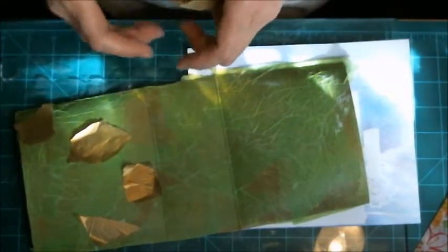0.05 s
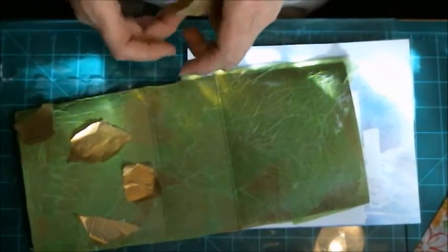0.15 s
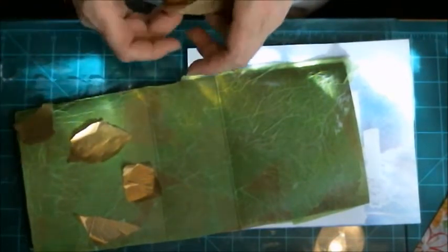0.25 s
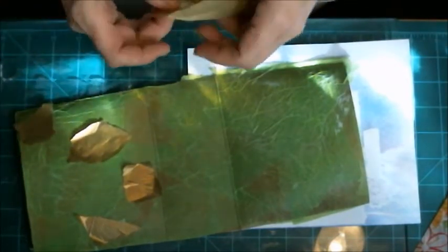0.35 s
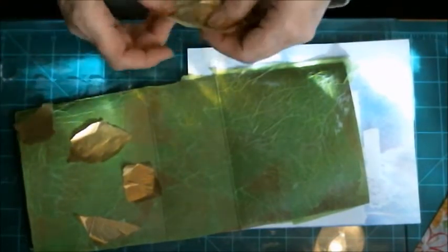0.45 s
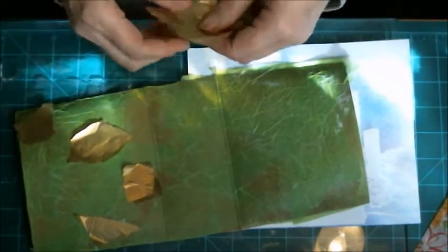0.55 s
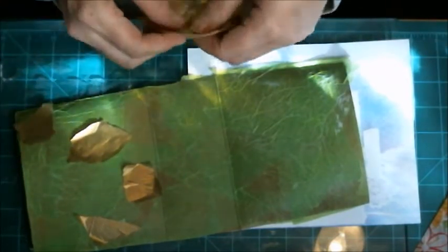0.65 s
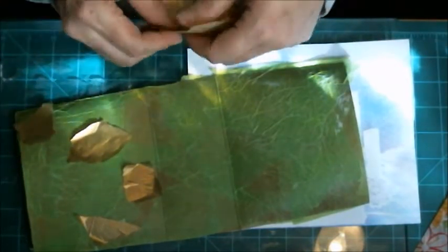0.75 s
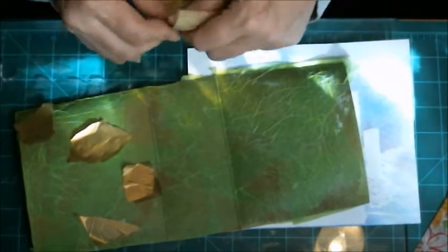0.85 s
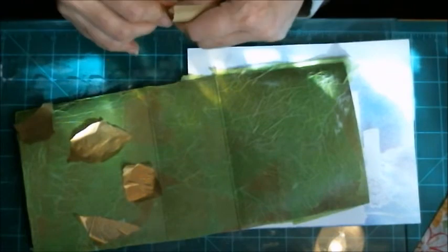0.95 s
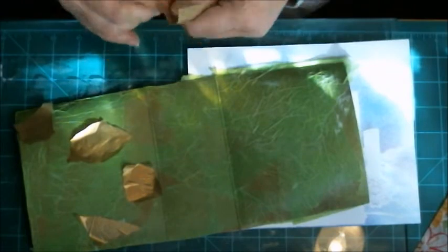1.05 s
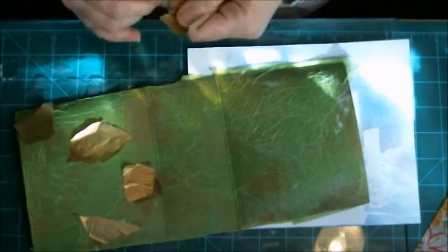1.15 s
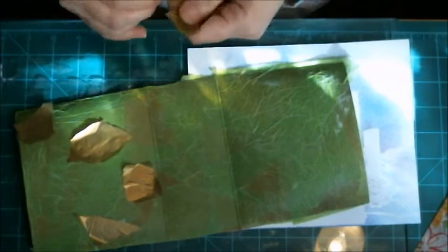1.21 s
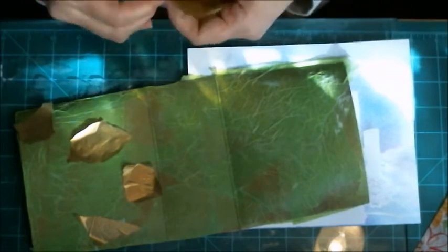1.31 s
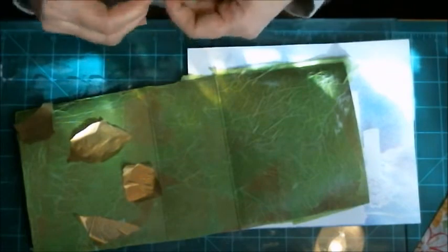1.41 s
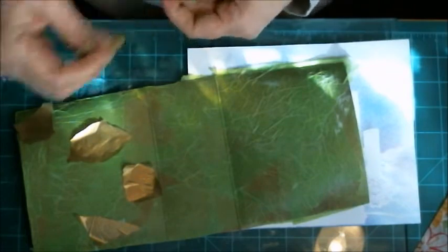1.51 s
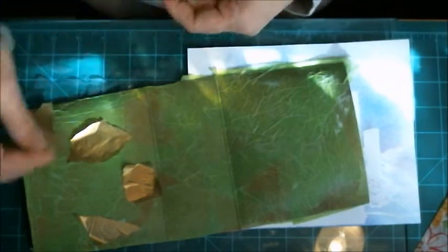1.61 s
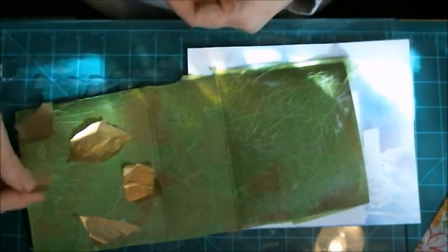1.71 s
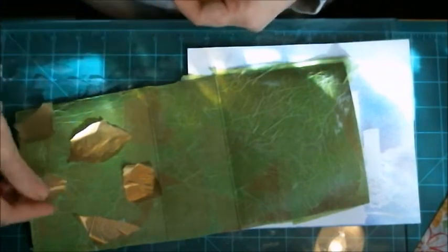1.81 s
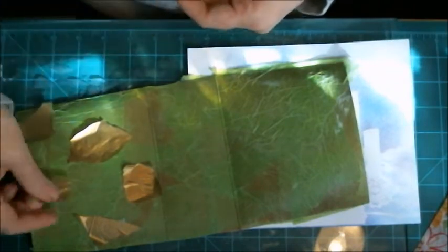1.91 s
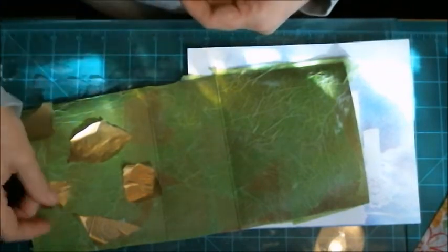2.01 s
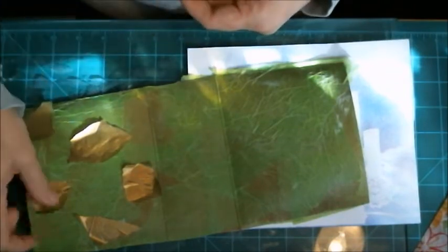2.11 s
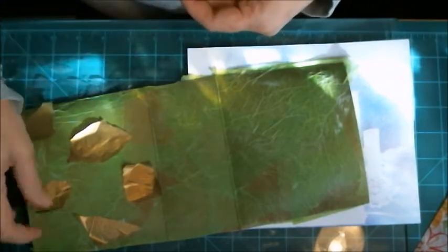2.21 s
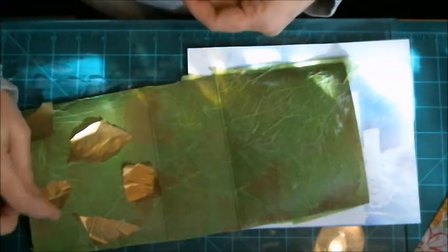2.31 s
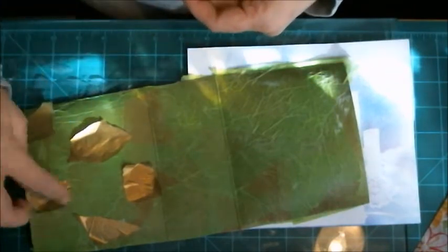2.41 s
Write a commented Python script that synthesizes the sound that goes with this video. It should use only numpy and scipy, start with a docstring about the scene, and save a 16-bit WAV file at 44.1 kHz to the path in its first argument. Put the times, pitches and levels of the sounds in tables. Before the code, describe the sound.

Stiff foil paper torn by hand in crackly bursts, then laid down with faint ticks

```python
"""Tearing of stiff foil paper

Stiff foil paper is torn close to a small microphone, then a piece is laid down with faint ticks in a quiet room.
Buckling creases are random impulses and noise bursts (crackle, snaps) that excite brief modes of small facets.
The flexing sheet pops, a twang and a puff of air mark the piece coming free, and the piece ticks on the table:
these are short tones. Sparse reflections and steady coloured noise form the room.
"""
import sys
import numpy as np
from scipy import signal
from scipy.fft import rfft, irfft
from scipy.io import wavfile
from scipy.ndimage import uniform_filter1d, minimum_filter1d

SR = 44100
rng = np.random.default_rng(int(sys.argv[2]) if len(sys.argv) > 2 else 0)


def file_out(sig):
    """Save sig as 16-bit WAV at sys.argv[1]."""
    # one column per channel
    cols = np.atleast_2d(sig).T
    # limit, then scale
    lim = np.clip(cols, -1, 1)
    pcm = np.round(lim * 32767).astype(np.int16)
    wavfile.write(sys.argv[1], SR, pcm)


N = 110250  # samples, 2.5 s

# Force of the tear: (time [s], crackle level [dB], mid body relative to crackle [dB])
TEAR_FORCE = [(0.0, -28, -19.5), (0.17, -45, 0.5), (0.199, -39.5, -25), (0.207, -29, -7),
              (0.309, -26.5, -25), (0.33, -32, 1), (0.379, -25.5, -15), (0.432, -22, -22),
              (0.462, -28, -4.5), (0.532, -17, -7), (0.581, -29, -7), (0.751, -26, -13), (0.758, -17.5, -2),
              (0.791, -22, -17), (0.82, -24.5, -5), (0.86, -25.5, -12.5), (0.982, -18, -11.5),
              (1.141, -14.5, -18.5), (1.209, -30, -9), (1.27, -22.5, -13), (1.285, -31.5, -8),
              (1.296, -18, -5), (1.402, -15.5, -7.5), (1.41, -35, -12), (1.428, -14, -15), (1.47, -34, -12),
              (1.55, -40, -10), (1.589, -30, -8.5), (1.682, -43, 5), (1.75, -61, -3), (1.911, -67, -4),
              (1.961, -64, -3), (2.07, -77.5, 7), (2.5, -82, 11.5)]
# Drive of the whole sheet's low shake: (time [s], level [dB])
SHEET_SHAKE = [(0, -99), (.2, -82), (.24, -55), (.304, -89.5), (.334, -47), (.42, -49.5), (.44, -61.5),
               (.48, -67), (.58, -71.5), (.62, -57.5), (.8, -48.5), (.88, -62), (1.016, -39), (1.242, -52),
               (1.34, -29), (1.44, -42.5), (1.49, -62.5), (1.674, -50), (1.778, -106), (2.5, -85)]
# Snaps of single creases, before the level trims:
# (centre time [s], level [dB], length [ms], mid body relative to level [dB])
CREASE_SNAPS = [(0.0328, -41, 9.4, -16), (0.116, -39.5, 54, -32), (0.1444, -30, 11, -2),
                (0.1522, -17.5, 1.6, -42), (0.164, -27.5, 25, -12), (0.2074, -25.5, 16, -26),
                (0.2156, -30, 3.4, 2), (0.2237, -16.5, 3.7, -17.5), (0.2619, -34.5, 1.6, -26),
                (0.2858, -24.5, 6.7, -40), (0.2953, -24.5, 13, -26.5), (0.33, -19, 16, -9.5),
                (0.3445, -16.5, 12, -4), (0.3569, -21.5, 11, -25), (0.3662, -14.5, 4.6, -22.5),
                (0.395, -19.5, 12, -7.5), (0.418, -16.5, 3.1, -15), (0.478, -16, 9, -4.5),
                (0.5121, -8.5, 4.6, -31.5), (0.5309, -8, 3.6, -35), (0.5427, -5, 3.7, -19.5),
                (0.55, -12.5, 2.1, -21), (0.5777, -21, 19, -35.5), (0.6007, -27, 8.9, -28.5),
                (0.6422, -20.5, 5.7, 1), (0.659, -14.5, 2.2, 5), (0.6654, -27.5, 9, 5.5),
                (0.694, -13.5, 4.3, -16), (0.7066, -25, 6, -27.5), (0.731, -20, 8.7, -4),
                (0.7325, -28.5, 3.8, -20), (0.766, -13, 6.8, -7), (0.8116, -32.5, 11, -29),
                (0.816, -13.5, 7.2, -23.5), (0.8365, -7, 3.4, -21), (0.85, -5, 1.3, -3.5),
                (0.8885, -17.5, 2.8, -19.5), (0.8995, -12, 3.8, -8), (0.9193, -11.5, 4.5, -4),
                (0.9245, -8, 4.6, -18.5), (0.966, -11, 3.9, -4), (1.011, -10, 34, -17),
                (1.0663, -23, 23, -31), (1.0744, -11, 8.4, -21.5), (1.116, -5, 3.3, -8),
                (1.1343, -17.5, 6.7, 3), (1.1617, -10.5, 3.5, -20), (1.1695, -20, 3.9, 0.5),
                (1.2169, -19, 9.4, -28), (1.2414, -17, 2.6, -20.5), (1.2616, -20, 8.4, -4.5),
                (1.3045, -1.5, 7, 0), (1.3147, -10, 12, -5.5), (1.3456, -9.5, 10, -1.5),
                (1.3563, -17.5, 16, -1.5), (1.3645, -7, 10, -15), (1.4096, -5.5, 16, -22.5),
                (1.545, -31.5, 8.6, -8), (1.5758, -31.5, 2.9, -22), (1.588, -32, 2.3, -6),
                (1.613, -23, 5.5, -11), (1.6197, -19.5, 6.3, 3), (1.6539, -14.5, 1.6, -14),
                (1.6607, -22, 3.2, -24), (1.6682, -31.5, 3.7, -4.5), (1.6753, -28, 18, 1),
                (1.7034, -34.5, 4.5, -22), (1.7099, -37.5, 34, -2.5), (1.7285, -46.5, 14, 7),
                (1.7513, -47, 6.7, -12.8), (1.7922, -49, 3.3, -10), (1.8164, -50.5, 11, -14),
                (1.847, -50, 14, -25), (1.9258, -51, 4.3, -32), (1.9774, -41.5, 18, -27),
                (2.022, -43.5, 34, -35), (2.054, -48.5, 15, -15.5), (2.252, -53.5, 12, -3),
                (2.368, -51, 5.2, -13)]
# Pops of the flexing sheet: (time [s], level before the rise [dB], pitch [Hz])
FLEX_POPS = [(.218, -41, 894), (.33, -23, 913), (0.353, -40.5, 306), (0.399, -44, 303), (0.396, -30, 918),
             (.4155, -14.5, 2130), (.421, -15.5, 2300), (.431, -13, 2210), (.444, -15.5, 2120),
             (.453, -28, 2080), (.507, -13.5, 2070), (.51, -24, 3860), (0.513, -14, 2150),
             (.525, -20, 2080), (.537, -24.5, 884), (.598, -34, 884), (.654, -35, 850), (0.666, -45.5, 265),
             (.67, -36.5, 657), (0.756, -23, 872), (0.77, -36.5, 524), (0.756, -3.5, 4000),
             (0.846, -27.5, 866), (0.85, -37.5, 3200), (0.987, -33.5, 341), (1.02, -26, 336),
             (1.021, -28, 884), (1.118, -37, 585), (1.186, -38.5, 527), (1.252, -35.5, 526),
             (1.326, -25.5, 524), (1.355, -24.5, 310), (1.359, -32.5, 864), (1.421, -29, 352),
             (1.542, -41.5, 452), (1.56, -40.5, 742), (1.587, -37.5, 336), (1.614, -32, 902),
             (1.67, -58, 850), (1.671, -36, 544), (1.677, -40, 340), (1.727, -50, 267)]
# Partials of the twang as the piece comes free: (pitch [Hz], level [dB])
TWANG_PARTIALS = [(1230, -21), (1720, -20), (1830, -17), (2150, -23), (2380, -22), (2730, -21), (2950, -24),
                  (3360, -24), (4330, -23), (4900, -21)]
# Ticks of the piece touching the table: (time [s], level before the rise [dB], pitch [Hz], 60 dB decay time [s])
TABLE_TICKS = [(1.79, -50.5, 1520, 0.11), (1.79, -56, 4320, 0.1), (1.926, -56, 5700, 0.17),
               (1.945, -42.5, 1580, 0.14), (1.974, -45, 1585, 0.15), (1.974, -51, 3150, 0.15),
               (1.978, -49.5, 3430, 0.079), (1.974, -35.5, 5240, 0.11), (1.976, -40, 7080, 0.23),
               (1.988, -43.5, 4570, 0.19), (1.997, -43, 5680, 0.17), (2.017, -48.5, 4570, 0.15),
               (2.018, -36, 5440, 0.081), (2.03, -51, 6100, 0.12), (2.192, -57, 1620, 0.08),
               (2.2505, -37, 2440, .02), (2.2462, -34.5, 4260, 0.015), (2.2505, -37.5, 4550, 0.027),
               (2.264, -47.5, 4450, 0.035), (2.265, -52, 2455, 0.06)]
# Spectra of the crisp top, the mid body, the low shake and the room air, each normalised when used:
# (frequency [Hz], relative density [dB])
CRISP_SPECTRUM = [(300, -68.5), (1500, -41.5), (2800, -11.5), (3600, -10.5), (5000, -2.5), (6200, 3),
                  (7000, 5.5), (7380, 9.5), (7600, -5)]
BODY_SPECTRUM = [(500, -50.5), (1100, -18.5), (1600, -8.5), (1900, -0.3), (2500, -6), (3300, -9),
                 (5000, -6.5)]
LOW_SPECTRUM = [(150, -41.5), (400, -21), (650, -7), (800, -5), (870, 6.5), (950, -6.5), (1300, -6),
                (2000, -23.5)]
AIR_SPECTRUM = [(15, -17.5), (25, 1), (108, 5.5), (196, -3.5), (248, 0.5), (602, -9.5), (1460, -9),
                (1610, -19), (3620, -23.5), (7600, -13.5), (9880, -50.5), (16700, -120)]

CRACKS_PER_S, CRACK_SPREAD_DB, CLUMP_DB = 1500, 2, 1
RUSTLE = 0.23  # rms of the noise beside cracks of rms 1
FACETS, FACET_HOLD = 32, 384  # facets in the foil; samples for which one is excited
RING_CYCLES = 100  # a facet mode dies by 60 dB in this many cycles
RING_SHARE, SNAP_RING_SHARE = 0.65, 0.3  # snaps are drier than the crackle
SNAP_RISE, SNAP_FALL = 0.25, 0.51  # Gaussian rise and exponential fall as shares of the length
SNAP_TRIM_DB, SNAP_BODY_TRIM_DB, SNAP_LOW_DB = 1.5, -6.5, -16
SNAP_LEAD = 600  # samples of envelope ahead of the snap's centre
TONE_RISE_S = 0.006  # time constant at 500 Hz, inversely proportional to pitch
WOBBLE_CYCLES, ROUGH_HZ = 13, 3200  # tones waver over some cycles, more so when high
CLEAN_S = 0.012  # a tone starts clean and reaches its full waver by this time
POP_DECAY_S, POP_SHORT_HZ = 0.09, 1500  # decay scale; pops above this pitch die much sooner
TWANG_S, TWANG_WIDE_S = 1.4125, 0.0055
PUFF_S, PUFF_WIDE_S, PUFF_HZ, PUFF_DB = 1.43, 0.0023, 96.3, -36
ROOM_T60_S, ROOM_DB, AIR_DB = 0.08, -15, -66.5
CEILING, EDGE_HZ = 0.97, 7640  # limiter ceiling at full scale 1; upper band edge


def amp(db):
    """Definition of the decibel: amplitude is 10 to the power of level / 20."""
    return 10 ** (np.asarray(db, float) / 20)


def even(x):
    """Power normalisation: the root mean square becomes 1."""
    return x / np.sqrt(np.mean(x ** 2) + 1e-20)


def colour(x, spectrum):
    """Linear filtering by a spectrum of unit mean-square gain, which keeps white noise at its level."""
    hz, db = np.transpose(spectrum)
    size = N + 4096
    log_bins = np.log(np.fft.rfftfreq(size, 1 / SR) + 1)
    gain = even(amp(np.interp(log_bins, np.log(hz), db)))
    return irfft(rfft(x, size) * gain, size)[:N]


def add(mix, s, sound):
    """Superposition: the sound is summed into the mix at s seconds."""
    part = mix[round(s * SR):][:len(sound)]
    part += sound[:len(part)]


def foil(drive, spectrum, ring_share=RING_SHARE):
    """Modal resonance: each moment of the drive rings one of many small facets with a few brief modes."""
    t = np.arange(2400) / SR
    facet = np.repeat(rng.integers(0, FACETS, size=N // FACET_HOLD + 1), FACET_HOLD)[:N]
    ringing = np.zeros(N)
    for k in range(FACETS):
        hz = rng.uniform(340, 8056, size=(16, 1))
        modes = np.sin(2 * np.pi * hz * t) * amp(-60 * t * hz / RING_CYCLES)
        response = modes.sum(0)
        response /= np.linalg.norm(response)
        ringing += signal.oaconvolve(drive * (facet == k), response)[:N]
    direct_share = np.sqrt(1 - ring_share ** 2)  # the two shares add in power
    return colour(ring_share * ringing + direct_share * drive, spectrum)


def crackle():
    """Random impulse excitation: clumped tiny cracks over a rustle follow the force of the tear."""
    t = np.arange(N) / SR
    s, db, body_db = np.transpose(TEAR_FORCE)
    level_db, body_db = np.interp(t, s, db), np.interp(t, s, body_db)
    shake_db = np.interp(t, *np.transpose(SHEET_SHAKE))
    slow_noise = uniform_filter1d(uniform_filter1d(rng.standard_normal(N), size=180), size=120)
    clump = amp(CLUMP_DB * even(slow_noise))
    crack_size = amp(CRACK_SPREAD_DB * np.minimum(rng.exponential(1, N), 5)) * rng.choice([-1, 1], N)
    cracks = even(crack_size * (rng.random(N) < CRACKS_PER_S / SR))
    drive = even((cracks + RUSTLE * rng.standard_normal(N)) * clump)
    crisp = foil(drive * amp(level_db), CRISP_SPECTRUM)
    body = foil(drive * amp(level_db + body_db), BODY_SPECTRUM)
    shake = colour(drive * amp(shake_db), LOW_SPECTRUM)
    return crisp + body + shake


def reflections(x):
    """Exponential decay of a sparse impulse response: reflections from table and walls."""
    at = np.arange(60, 9000, 22)
    taps = np.zeros(9100)
    signs = rng.choice([-1, 1], len(at))
    taps[at + rng.integers(0, 22, len(at))] = signs * amp(-60 * at / SR / ROOM_T60_S)
    return signal.oaconvolve(x, taps / np.linalg.norm(taps))[:N]


def room_air():
    """Stationary noise: a steady coloured floor fills the quiet room."""
    return amp(AIR_DB) * colour(rng.standard_normal(N), AIR_SPECTRUM)


def snaps():
    """Transient excitation: brief noise bursts, crisp on top with a duller body, drive the facets."""
    ms = np.arange(-SNAP_LEAD, 1400) / SR * 1000
    top_power, body_power = np.zeros(N), np.zeros(N)  # overlapping snaps add in power
    for s, db, length, body_db in CREASE_SNAPS:
        rise = np.exp(-0.5 * (ms / (SNAP_RISE * length)) ** 2)
        fall = np.exp(-abs(ms) / (SNAP_FALL * length))
        power = np.where(ms < 0, rise, fall) ** 2
        start = s - SNAP_LEAD / SR
        add(top_power, start, amp(2 * (db + SNAP_TRIM_DB)) * power)
        add(body_power, start, amp(2 * (db + body_db + SNAP_BODY_TRIM_DB)) * power)
    burst = rng.standard_normal(N)
    top_burst, body_burst = np.sqrt(top_power) * burst, np.sqrt(body_power) * burst
    crisp = foil(top_burst, CRISP_SPECTRUM, SNAP_RING_SHARE)
    body = foil(body_burst, BODY_SPECTRUM, SNAP_RING_SHARE)
    return crisp + body + amp(SNAP_LOW_DB) * colour(body_burst, LOW_SPECTRUM)


def dying_tone(db, hz, t60):
    """Damped oscillation: a sine rises quickly, decays exponentially and wavers at random in amplitude."""
    t = np.arange(5000) / SR
    rise = 1 - np.exp(-t / (TONE_RISE_S * 500 / hz))
    span = int(WOBBLE_CYCLES * SR / hz) + 1
    drift = even(uniform_filter1d(uniform_filter1d(rng.standard_normal(len(t)), span), span))
    rough = min(0.15 + (hz / ROUGH_HZ) ** 2, 1) * np.minimum(t / CLEAN_S, 1)
    wobble = 1 - rough + rough * drift
    return amp(db - 60 * t / t60) * rise * wobble * np.sin(2 * np.pi * hz * t)


def pops():
    """Frequency-dependent damping: the flexing sheet pops, and higher pops die sooner."""
    out = np.zeros(N)
    for s, db, hz in FLEX_POPS:
        t60 = POP_DECAY_S * (300 / hz) ** 0.37 / (1 + (hz / POP_SHORT_HZ) ** 2)
        add(out, s, dying_tone(db, hz, t60))
    return out


def twang():
    """Superposition of partials: sines of random phase share one short Gaussian envelope."""
    t = np.arange(N) / SR
    bell = np.exp(-0.5 * ((t - TWANG_S) / TWANG_WIDE_S) ** 2)
    return bell * sum(amp(db) * np.sin(2 * np.pi * (hz * t + rng.random())) for hz, db in TWANG_PARTIALS)


def puff():
    """Pressure pulse: the puff of air is a low cosine in a very short Gaussian envelope."""
    t = np.arange(N) / SR - PUFF_S
    return amp(PUFF_DB) * np.exp(-0.5 * (t / PUFF_WIDE_S) ** 2) * np.cos(2 * np.pi * PUFF_HZ * t)


def ticks():
    """Impact excitation: the piece touching the table gives small ringing tones, each with its own decay."""
    out = np.zeros(N)
    for s, db, hz, t60 in TABLE_TICKS:
        add(out, s, dying_tone(db, hz, t60))
    return out


def scene():
    """Superposition of the paper's sounds, their reflections and the room air."""
    paper = crackle() + snaps() + pops() + twang() + puff() + ticks()
    return (paper + amp(ROOM_DB) * reflections(paper) + room_air())[None]


def record(dry):
    """Gain control and band limitation: a quick limiter restrains the peaks, then a low-pass filter acts."""
    safe_gain = minimum_filter1d(CEILING / np.maximum(abs(dry), CEILING), size=121)
    held = dry * uniform_filter1d(uniform_filter1d(safe_gain, size=41), size=41)
    low_pass = signal.firwin(331, EDGE_HZ, window=("kaiser", 7), fs=SR)
    return signal.oaconvolve(held, low_pass[None], "same")


dry = scene()
out = record(dry)
file_out(out)
```